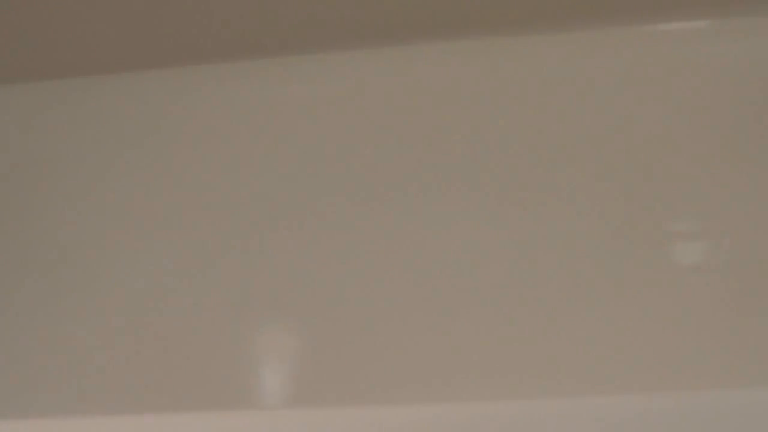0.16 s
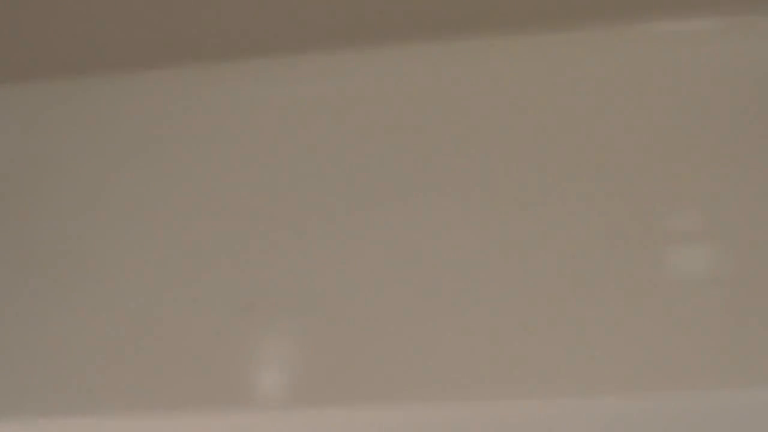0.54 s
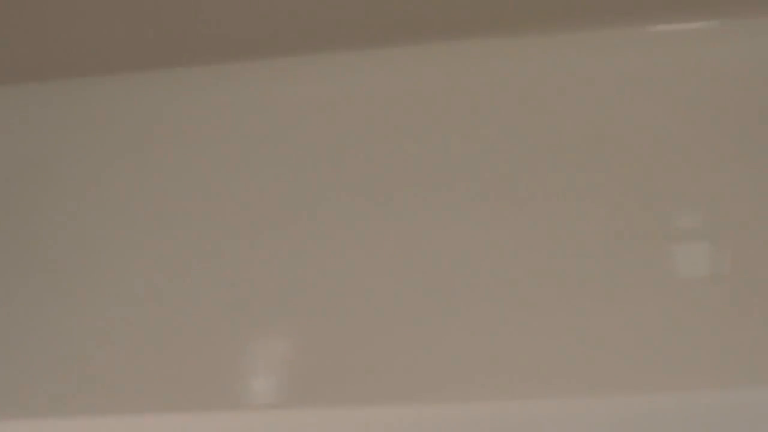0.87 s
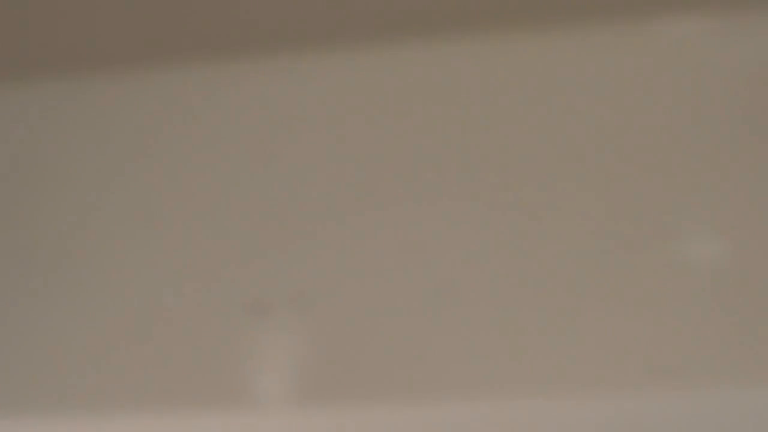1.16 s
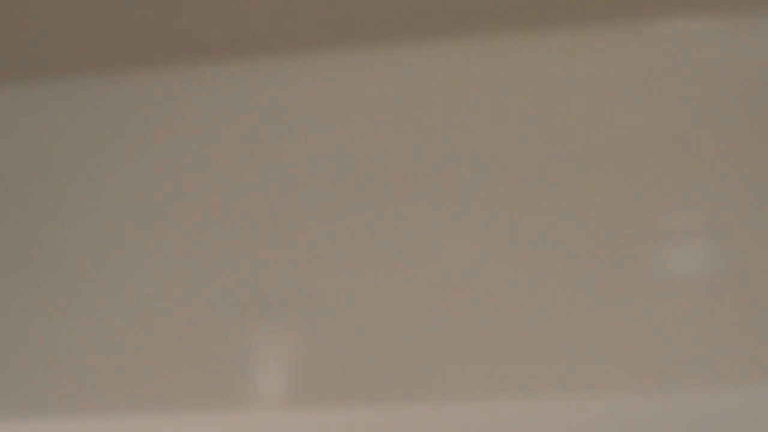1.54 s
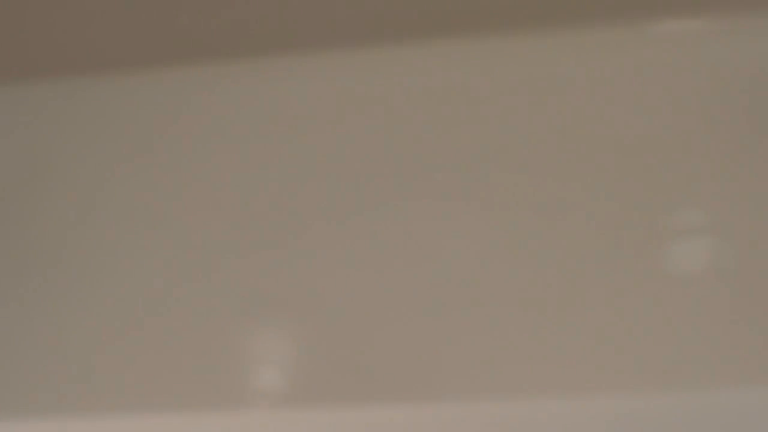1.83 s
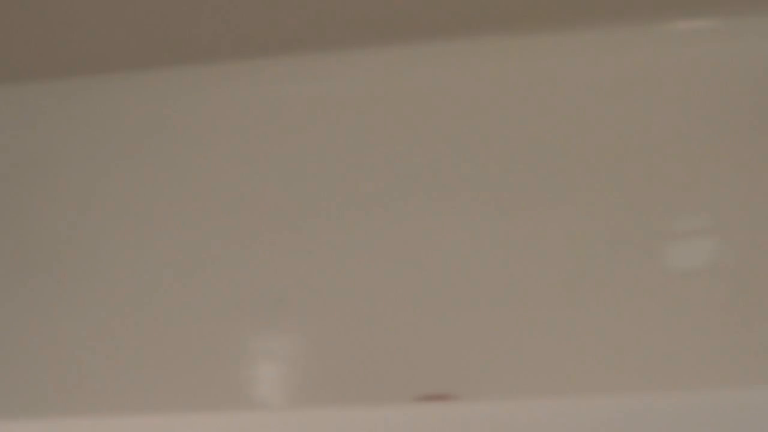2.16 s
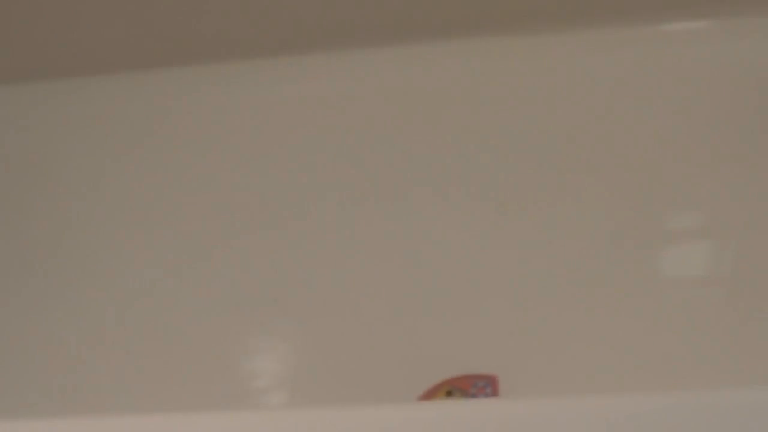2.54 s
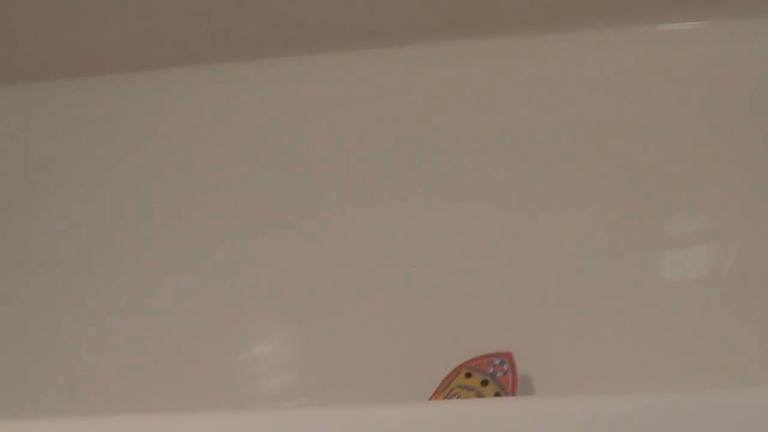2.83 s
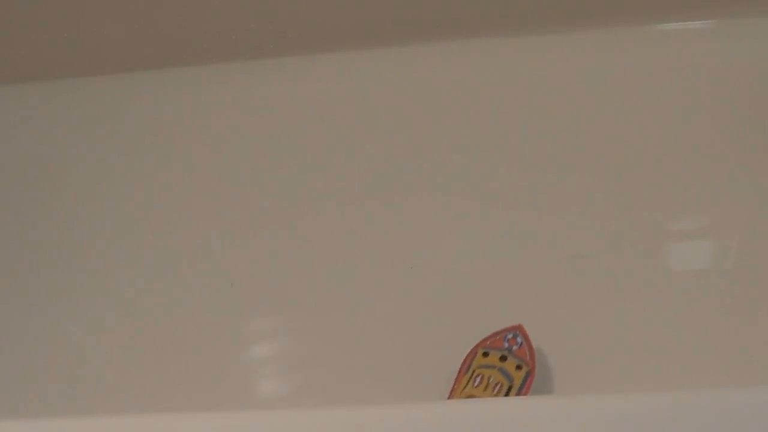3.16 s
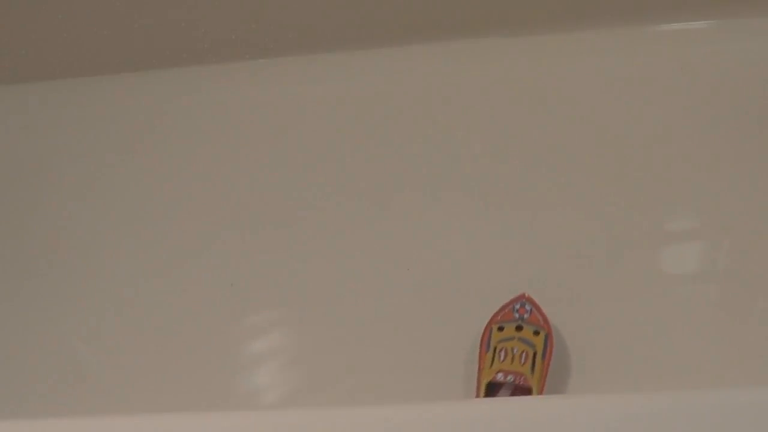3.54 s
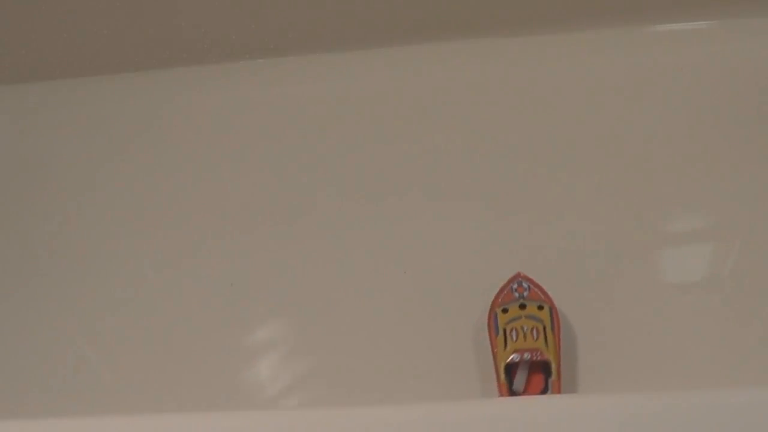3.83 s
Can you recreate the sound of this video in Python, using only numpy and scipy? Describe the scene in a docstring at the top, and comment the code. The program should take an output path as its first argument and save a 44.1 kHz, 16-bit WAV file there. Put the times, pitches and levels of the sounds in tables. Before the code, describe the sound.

Rapid, tinny putt-putt of a candle-heated toy boat in a small, echoing room.

```python
"""A quick, tinny putt-putt, about nine and a half a second: a candle-heated tin boat crosses a bathtub.
Each cycle the boiler's thin lid buckles out and, more softly, back, which excites its modes of vibration;
a few pops end in a bright snap. Reflections and resonances of the tub change as the boat moves.
Behind it are the reverberation of a small hard room, two water ticks, a dull bump, a brief hiss
and a faint electronic whine."""
import sys
import numpy as np
from scipy import signal
from scipy.fft import rfft, irfft
from scipy.io import wavfile

SR = 44100
rng = np.random.default_rng(int(sys.argv[2]) if len(sys.argv) > 2 else 0)


def materialize(psi):
    """Save the field psi as 16-bit PCM at rate SR to the path in sys.argv[1].

    A 1-D psi becomes a single channel; in a 2-D psi each row is a channel.
    """
    bounded = np.clip(np.atleast_2d(psi).T, -1, 1)
    quanta = np.round(bounded * 32767).astype(np.int16)
    wavfile.write(sys.argv[1], SR, quanta)


N = 176400
SCENE_T, T = np.arange(N) / SR, np.arange(SR // 8) / SR  # t/s over the scene and over one event


def amp(db):
    """Amplitude ratio of a level in decibels."""
    return 10 ** (np.asarray(db) / 20)

def read(points, hz):
    """Interpolation of a table on a logarithmic frequency axis."""
    f, value = np.transpose(points)
    return np.interp(np.log(hz + 1), np.log(f), value)

def burst(x):
    """Energy normalisation: a short sound gets the energy of 25 ms at unit power."""
    return x / np.sqrt(np.sum(np.atleast_2d(x) ** 2, 1).mean() / (SR // 40) + 1e-20)

def add(mix, s, sound):
    """Superposition: a sound joins the mix at time s."""
    part = mix[:, max(round(s * SR), 0):][:, :sound.shape[-1]]
    part += sound[..., :part.shape[1]]

def colour(x, points):
    """Linear filtering: the spectrum is multiplied by a response (f/Hz, level/dB)."""
    return irfft(rfft(x) * amp(read(points, np.fft.rfftfreq(x.shape[-1], 1 / SR))), x.shape[-1])

def ring(modes):
    """Free vibration: one damped sine per mode (f/Hz, level/dB, T60/s)."""
    return sum(amp(db - 60 * T / t60) * np.sin(2 * np.pi * hz * T) for hz, db, t60 in modes)

def swell(tau_s):
    """Quadratic growth under exponential decay, peaking at twice tau_s."""
    return (T / tau_s) ** 2 * np.exp(-T / tau_s)

def correlated(a, b, likeness):
    """Partial correlation: two independent noises mix into a left-right pair."""
    return np.array([a, likeness * a + np.sqrt(1 - likeness ** 2) * b])


# room noise spectrum: f/Hz, relative level/dB
AIR_SPECTRUM = [(25, -76.5), (60, -80), (130, -78), (280, -73), (600, -74.5), (1200, -70), (2800, -82.5),
                (5000, -87.5), (9000, -93.5), (12000, -97), (15500, -94.5)]
# likeness of left and right: f/Hz, correlation
AIR_CORRELATION = [(30, 1), (120, 0.77), (300, 0.46), (1000, 0.58), (5000, 0.32), (12000, 1)]
# electronic tones: f/Hz, level/dB
WHINES = [(15734.3, -60.5), (15747.3, -66)]

def air():
    """Beating: two close electronic tones throb faintly over steady room noise."""
    a, b = rfft(rng.standard_normal((2, N)))
    likeness = read(AIR_CORRELATION, np.fft.rfftfreq(N, 1 / SR))
    noise = colour(irfft(correlated(a, b, likeness), N), AIR_SPECTRUM)
    whine = sum(amp(db) * np.sqrt(2) * np.sin(2 * np.pi * hz * SCENE_T) for hz, db in WHINES)
    return amp(-39.5) * noise / noise.std() + whine


# hiss spectrum: f/Hz, relative level/dB
HISS_SPECTRUM = [(2000, -9), (4000, 6), (7000, 8), (10000, 8), (13000, -3), (16000, -5)]

def hiss(peak_s=1.913, width_s=.074):
    """Amplitude modulation: high noise swells once under a Gaussian envelope."""
    noise = colour(rng.standard_normal(N), HISS_SPECTRUM)
    envelope = np.exp(-.5 * ((SCENE_T - peak_s) / width_s) ** 2)
    return amp(-48.5) * noise / noise.std() * envelope


# water ticks: t/s, f/Hz, level/dB
TICKS = [(2.4498, 6040, -44), (2.922, 3700, -47.5)]
# bump spectrum: f/Hz, relative level/dB
BUMP_SPECTRUM = [(100, -25.5), (200, -14), (280, 1), (400, 1), (520, 1.5), (700, 0.5), (1400, -35)]

def water(tick_t60=.006, bump_s=1.572):
    """Damped transients in the tub: tiny ringing ticks and one dull bump of low noise."""
    out = np.zeros((2, N))
    for s, hz, db in TICKS:
        add(out, s, amp(db) * burst(ring([(hz, 0, tick_t60)])))
    bump = colour(rng.standard_normal(len(T)), BUMP_SPECTRUM) * swell(tau_s=.018)
    add(out, bump_s, amp(-32.5) * burst(bump))
    return out


# reverberation time: f/Hz, T60/s
ROOM_T60 = [(200, 0.59), (1500, 1), (4000, 0.47), (9000, 0.62), (16000, 0.26)]
# spectrum of the tail: f/Hz, gain/dB
ROOM_RESPONSE = [(200, 1), (720, -3), (1100, -1), (1400, -11), (2000, -3), (2450, -1), (2850, -5.5),
                 (3600, 4), (4200, -4), (5050, -2), (6200, -5), (14000, -8)]

def room(x, rise_s=.0013):
    """Reverberation: dense reflections form a noise tail, each band decaying at its own rate."""
    a, b = rng.choice([-1., 1.], (2, SR // 2))
    hz, t, bands = signal.stft(correlated(a, b, likeness=.83), SR, nperseg=256)
    bands = bands * amp(-60 * t / read(ROOM_T60, hz)[:, None]) * (1 - np.exp(-t / rise_s))
    tail = signal.istft(bands, SR, nperseg=256)[1]
    tail = colour(tail / np.linalg.norm(tail[0]), ROOM_RESPONSE)
    return signal.fftconvolve(x, tail, axes=1)[:, :N]


# modes of the tub: f/Hz, T60/s, early drive level/dB, late drive level/dB
TUB_MODES = [(623, .3, -8, -16), (730, .15, -12, -12), (1044, .55, 0, 9), (1316, .2, -16, -13),
             (1432, .2, -16, -14), (1577, .3, -12, -1), (1651, .25, -5, -12), (1850, .15, 1, -4),
             (2288, .3, -4, 6)]

def tub(x, crossing_s=(1.2, 2.8)):
    """Resonance: how strongly each narrow mode is driven depends on where the boat is."""
    out = np.zeros((2, N))
    for hz, t60, early_db, late_db in TUB_MODES:
        b, a = signal.iirpeak(hz, Q=hz * t60 * np.pi / np.log(1000), fs=SR)
        out += signal.lfilter(b, a, x * amp(np.interp(SCENE_T, crossing_s, [early_db, late_db])))
    return out


# four waypoints of the boat: t/s
WAYPOINTS_S = [.75, 1.6, 2.4, 3.65]
# paths to the listener: delay/s, then relative level/dB at each waypoint
ECHO_PATHS = [(0, 1, 1, 0.5, 10), (.0030, 2.5, -5, -10.5, 7), (.0058, -1.5, 5.5, 7, 0),
              (.0083, 0, -1.5, -4.5, 16), (0.0133, -1, 0, 2, -1), (.0173, -6, -4, -8, 3),
              (0.021, 1, 1.5, -5, 4), (0.0294, -1, -1.5, -6, -10), (.0361, -7, -3, -12, -20)]

def echoed(sound, s, fade_db_per_s=0, spread=.26):
    """Multipath interference: delayed copies from the tub walls add, weighted for the boat at time s."""
    out = np.zeros((2, len(T)))
    for k, (delay, *dbs) in enumerate(ECHO_PATHS):
        side = spread * (-1) ** k
        gain = amp(np.interp(s, WAYPOINTS_S, dbs) + fade_db_per_s * delay)
        add(out, delay, gain * np.array([[1 + side], [1 - side]]) * sound)
    return np.array([burst(channel) for channel in out])

def buckle(response, crinkles_per_s=790, decay_s=.01):
    """Impulse excitation: one pop of the tin, then tiny random crinkles, each start the response anew."""
    drive = rng.standard_normal(len(T)) * (rng.random(len(T)) < crinkles_per_s / SR)
    drive *= amp(-13) * np.exp(-T / decay_s)
    drive[0] = 1
    return signal.fftconvolve(response, drive)[:len(T)]


# hard snaps of the lid: t/s, level/dB of the crack
SNAPS = [(0.423, -36), (1.058, -34.5), (1.155, -34.5), (2.626, -34.5), (3.149, -39), (3.251, -38),
         (3.992, -37)]
# crack spectrum: f/Hz, relative level/dB
CRACK_SPECTRUM = [(300, -17), (900, 14), (1800, 0), (2500, 15.5), (2850, -11), (5000, 5), (6500, 0.5),
                  (9000, -1.5), (11500, -27), (13200, -5), (16000, -41)]
# modes of the clack: f/Hz, relative level/dB, T60/s
CLACK_MODES = [(1630, -3, 0.035), (1825, 13.5, 0.05), (2050, -11, 0.044)]

def snaps(t60=.13, rise_s=.0052):
    """Hard buckling: the tin gives a modal clack scattered by the tub and a bright crack."""
    out = np.zeros((2, N))
    envelope = amp(-60 * T / t60) * (1 - np.exp(-T / rise_s))
    for s, db in SNAPS:
        mid, side = colour(rng.standard_normal((2, len(T))), CRACK_SPECTRUM)
        crack = np.array([mid + .32 * side, mid - .069 * side]) * envelope
        add(out, s, amp(db) * burst(crack))
        add(out, s, amp(db + 3) * echoed(buckle(ring(CLACK_MODES)), s))
    return out


# high modes of the lid: f/Hz, relative level/dB
HIGH_MODES = [(3450, -14.5), (3680, 4), (4300, -4.5), (4950, 5), (7180, -10.5), (8650, -11)]

def crinkle(t60=.0045, scatter=.02):
    """Random excitation: a swell of tiny slips rings the high modes, slightly detuned each time."""
    modes = [(hz * (1 + scatter * rng.standard_normal()), db, t60) for hz, db in HIGH_MODES]
    slips = rng.standard_normal(len(T)) ** 3 * swell(tau_s=.0014)
    return signal.fftconvolve(ring(modes), slips)[:len(T)]


# drift of the lid's tone: t/s, f/Hz of the main mode, relative level/dB of the hollow pop
LID_TONE = [(0, 1400, -41), (.35, 1400, -28.5), (0.899, 1385, -27), (1.5, 1430, -31), (1.9, 1465, -30.5),
            (2.5, 1440, -38), (2.95, 1450, -36), (3.4, 1400, -50), (3.9, 1370, -38)]

def lid_hz(s, scatter=.01):
    """Natural frequency of the main mode at time s, with random scatter between strokes."""
    times, pitches, _ = np.transpose(LID_TONE)
    return np.interp(s, times, pitches) * (1 + scatter * rng.standard_normal())

def hollow_pop(s, t60=.03, rise_s=.007):
    """Damped oscillation with a soft onset, about an octave below the main mode."""
    times, _, dbs = np.transpose(LID_TONE)
    hz = .4963 * lid_hz(s, scatter=.012)
    pop = ring([(hz, 0, t60)]) * (1 - np.exp(-T / rise_s)) ** 2
    return amp(np.interp(s, times, dbs) - 6.5) * burst(pop)

def give(s, flat=.06, glide_s=.016):
    """Elastic bending: the lid bows before it pops, a soft tone gliding up towards the main mode."""
    hz = .975 * lid_hz(s) * (1 - flat * np.exp(-T / glide_s))
    return np.sin(2 * np.pi * np.cumsum(hz) / SR) * swell(tau_s=.0036)


# held note at each waypoint: level/dB relative to its stroke
NOTE_DB = [-8.5, -12, -16, -19]

def held_note(s, length_s=.052, dip=.06):
    """Frequency modulation: the bulging lid holds a note that sags mid-stroke and rises again."""
    arch = abs(np.sin(np.pi * np.minimum(T / length_s, 1)))
    hz = 1.03 * lid_hz(s) * (1 - dip * arch)
    tone = np.sqrt(arch) * np.sin(2 * np.pi * (np.cumsum(hz) / SR + rng.random()))
    return amp(np.interp(s, WAYPOINTS_S, NOTE_DB)) * burst(tone)


# other low modes of the lid: f/Hz, relative level/dB, T60/s
LOW_MODES = [(1104, -16, 0.04), (1606.4, -4.5, 0.034), (1808, -7.5, 0.028), (2125, -9, 0.017),
             (2390, -17, 0.014)]

def flex(s, pitch=1, t60=.022, sharp=.06, relax_s=.005, rise_s=.00081):
    """Modal vibration after buckling: the main mode starts sharp and relaxes, the others hold pitch."""
    hz = pitch * lid_hz(s) * (1 + sharp * np.exp(-T / relax_s))
    main = amp(-60 * T / t60) * np.sin(2 * np.pi * np.cumsum(hz) / SR)
    others = amp(np.interp(s, WAYPOINTS_S, [.5, 5, 1, -4])) * ring(LOW_MODES)
    return buckle((main + others) * (1 - np.exp(-T / rise_s)))


# outward strokes: t/s, relative level/dB, relative level/dB of the high modes
PUTTS = [(0.0004, -19, -42.5), (0.1072, -21.5, -49), (0.2113, -20.5, -48.5), (0.3187, -19, -46.5),
         (0.4259, -20, -38.5), (0.5237, -17, -43), (0.6334, -17.5, -42.5), (0.743, -18.5, -43.5),
         (0.8468, -17, -45), (0.9554, -18.5, -43), (1.0555, -17.5, -40), (1.1543, -17.5, -35),
         (1.2542, -18.5, -41), (1.3644, -20, -42.5), (1.4715, -17, -40.5), (1.5766, -18.5, -41.5),
         (1.6864, -19.5, -45), (1.7893, -19, -43.5), (1.8934, -19, -43.5), (1.9965, -17, -42.5),
         (2.1016, -18, -43.5), (2.2064, -15.5, -42), (2.3124, -16, -42.5), (2.4176, -16.5, -41),
         (2.5257, -16, -40), (2.6248, -14.5, -37), (2.7242, -16.5, -40.5), (2.832, -17.5, -45),
         (2.9417, -15, -41), (3.0461, -16.5, -40.5), (3.1483, -15, -37.5), (3.2501, -16.5, -35),
         (3.352, -14.5, -41), (3.4569, -13, -37), (3.5643, -13.5, -40), (3.6673, -13.5, -40.5),
         (3.7767, -15.5, -45), (3.8838, -13, -45), (3.9873, -14.5, -42.5)]
# return strokes: t/s, relative level/dB
RETURNS = [(0.0652, -26.5), (0.176, -36), (0.289, -32.5), (0.385, -24.5), (0.4956, -27.5), (0.598, -25),
           (0.7043, -30.5), (0.8102, -30), (0.922, -25), (1.0296, -27), (1.1171, -26), (1.2115, -27),
           (1.3305, -28.5), (1.4277, -26), (1.5415, -24.5), (1.6442, -25), (1.7542, -25.5), (1.8585, -23.5),
           (1.9655, -22), (2.0677, -25), (2.1681, -22.5), (2.2754, -24), (2.38, -22), (2.4902, -22.5),
           (2.587, -23), (2.6906, -23), (2.797, -27.5), (2.905, -25.5), (3.011, -24), (3.1149, -23.5),
           (3.2088, -30), (3.3126, -23), (3.422, -20.5), (3.5272, -22), (3.6317, -23), (3.7434, -23.5),
           (3.8492, -24), (3.9532, -39)]
# response of the hull: f/Hz, gain/dB
HULL_RESPONSE = [(200, -15), (850, -8), (1200, 3.5), (1500, -4), (2000, -3.5), (2480, 3), (2900, -25),
                 (6000, -24)]

def lid(soft_echo_db_per_s=-520, high_fade_s=.1):
    """Snap-through buckling: each cycle the lid gives, pops out ringing, then eases back a little lower."""
    low, rest = np.zeros((2, 2, N))
    for s, db, high_db in PUTTS:
        add(low, s - .016, amp(db - 15.5) * echoed(give(s), s, soft_echo_db_per_s))
        add(low, s, amp(db - 4) * echoed(flex(s), s))
        add(low, s, amp(db) * held_note(s))
        high = echoed(crinkle(), s) * np.exp(-T / high_fade_s)
        add(rest, s - .0032, amp(high_db + 2.5) * burst(high))
        add(rest, s - .00604, hollow_pop(s))
    for s, db in RETURNS:
        add(low, s, amp(db - 5.5) * echoed(flex(s, pitch=.97), s, soft_echo_db_per_s))
        add(low, s - .005, amp(db - 6) * echoed(give(s), s, soft_echo_db_per_s))
    return colour(low, HULL_RESPONSE) + rest


def scene():
    """Superposition of the sound in the tub, its reverberation and the background."""
    boat, cracks, ticks_and_bump = lid(), snaps(), water()
    near = amp(-4.5) * (boat + tub(boat)) + cracks + ticks_and_bump
    room_send = amp(np.interp(SCENE_T, WAYPOINTS_S, [-7, -5.5, -5, -6.5]))
    reverberation = room(room_send * boat + cracks + amp(-6) * ticks_and_bump)
    return near + reverberation + hiss() + air()

def record(dry):
    """Band limiting: a linear-phase low-pass filter cuts off at 16 kHz."""
    lowpass = signal.firwin(1023, 16000, window=("kaiser", 9), fs=SR)
    return signal.oaconvolve(dry, lowpass[None], "same")


dry = scene()
out = record(dry)
materialize(out)
```